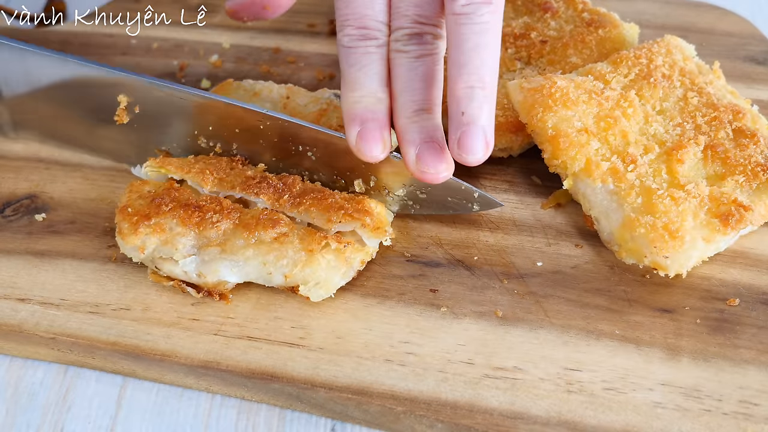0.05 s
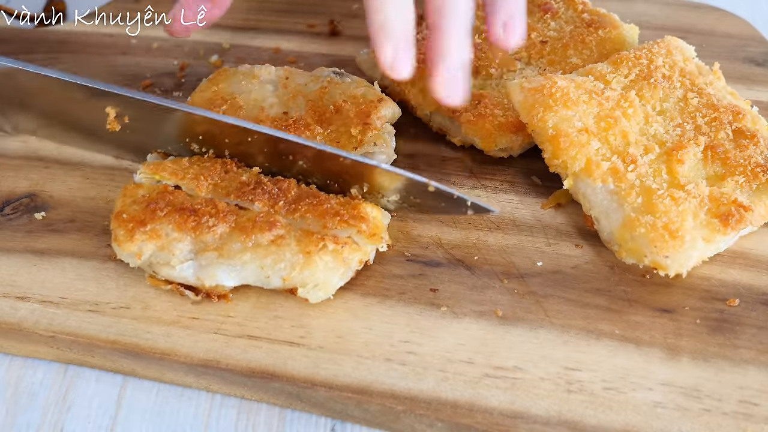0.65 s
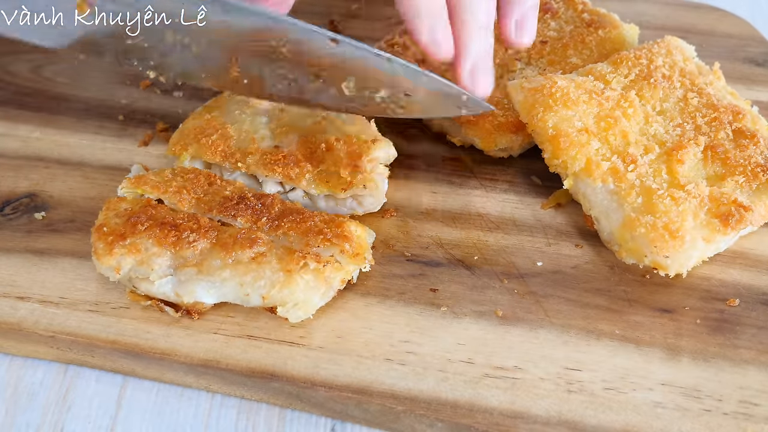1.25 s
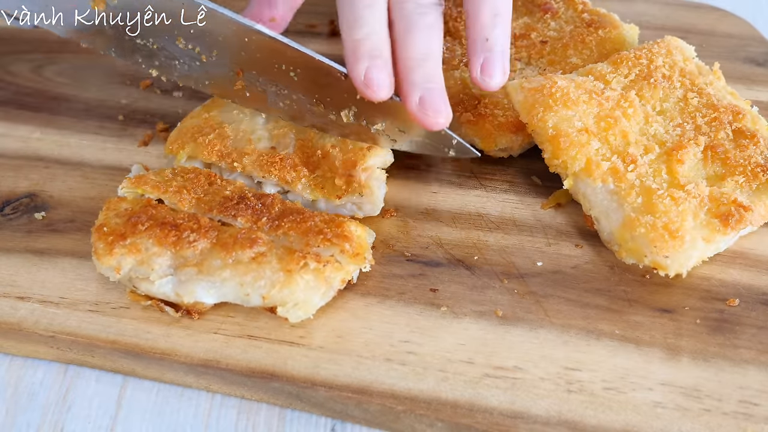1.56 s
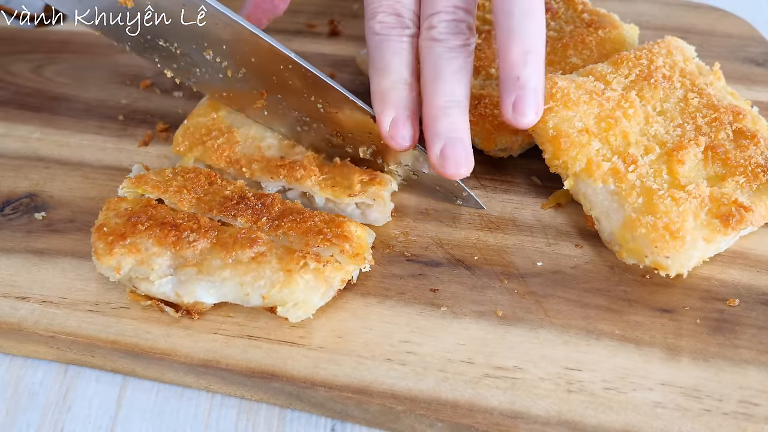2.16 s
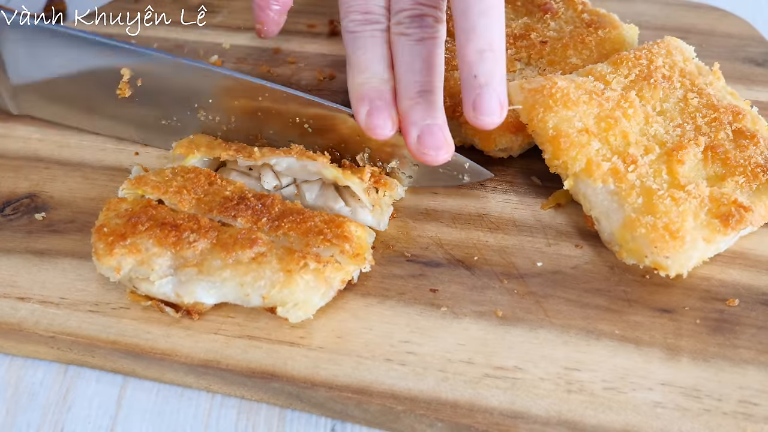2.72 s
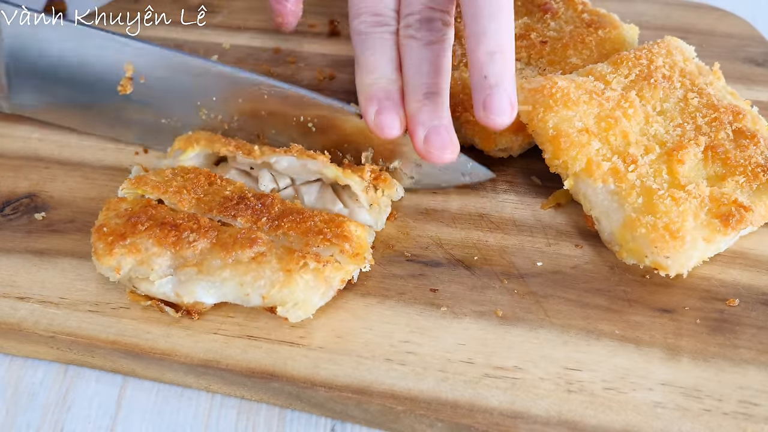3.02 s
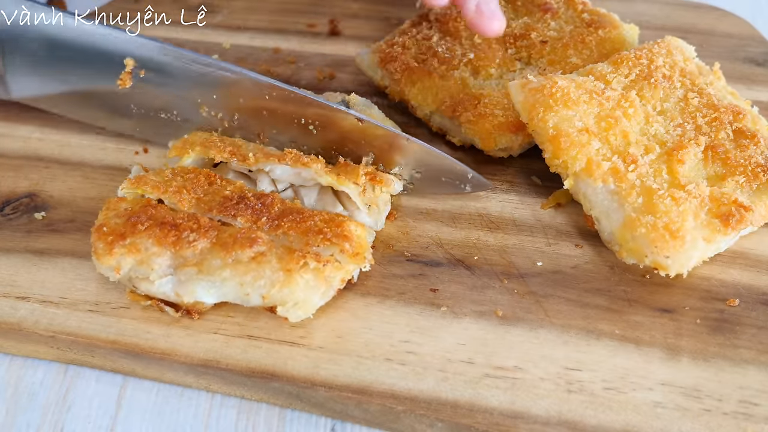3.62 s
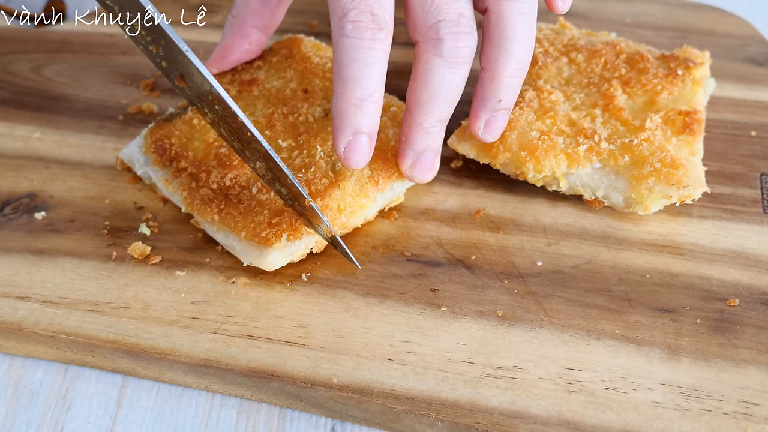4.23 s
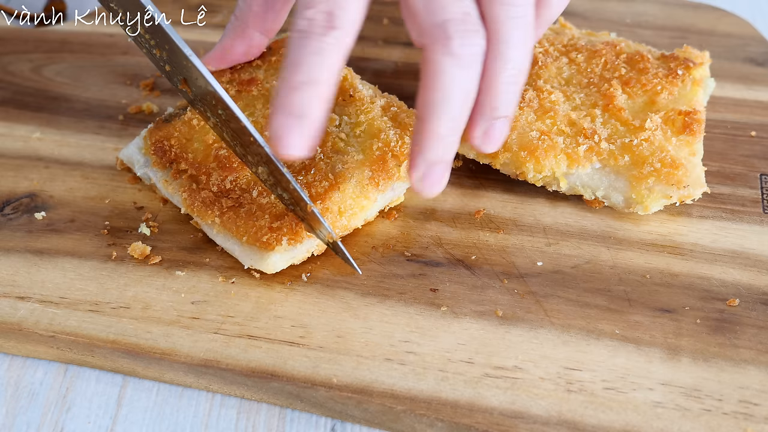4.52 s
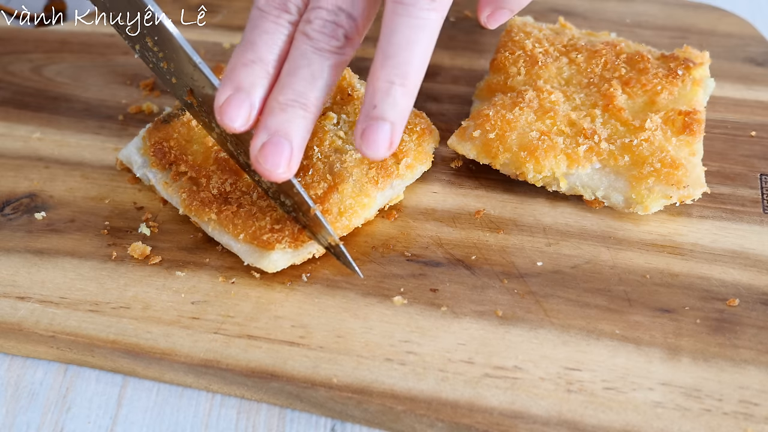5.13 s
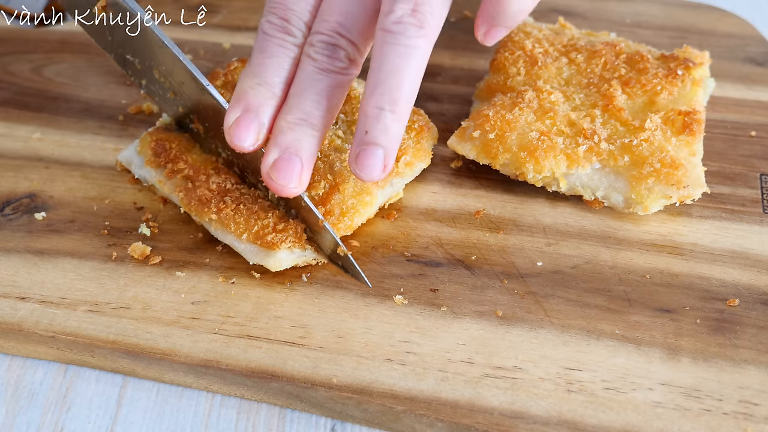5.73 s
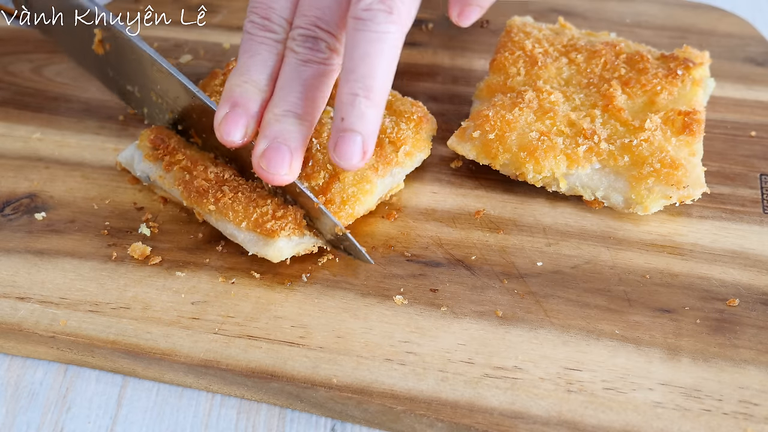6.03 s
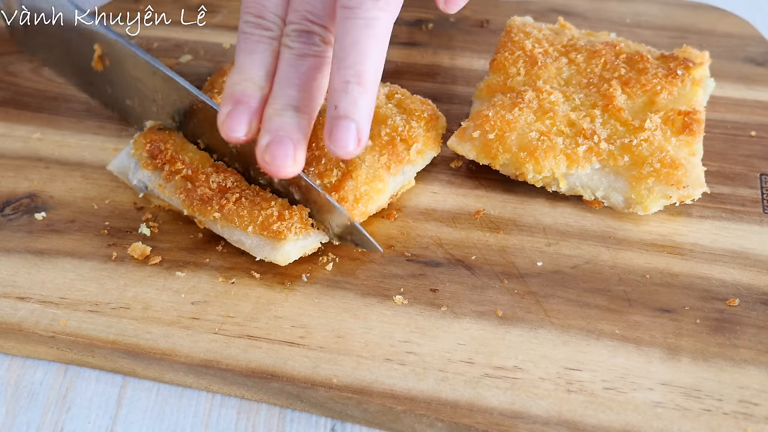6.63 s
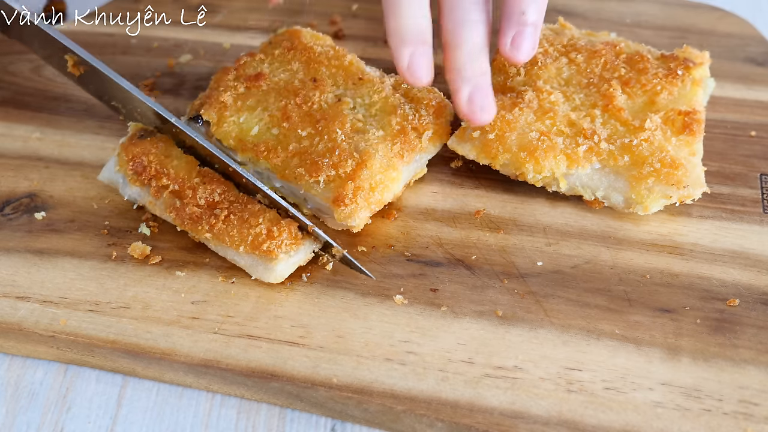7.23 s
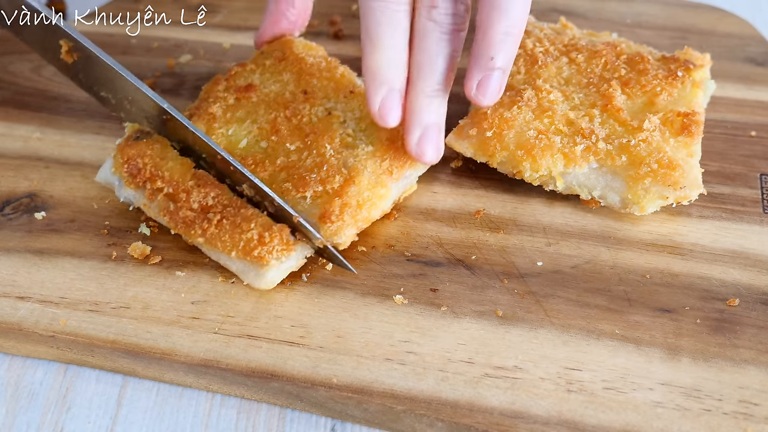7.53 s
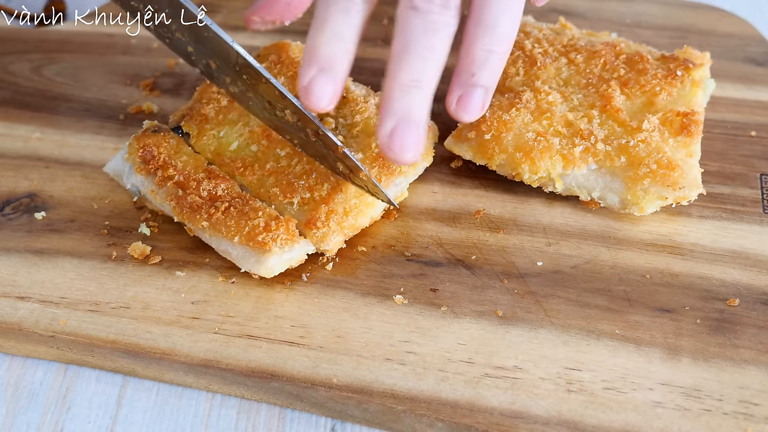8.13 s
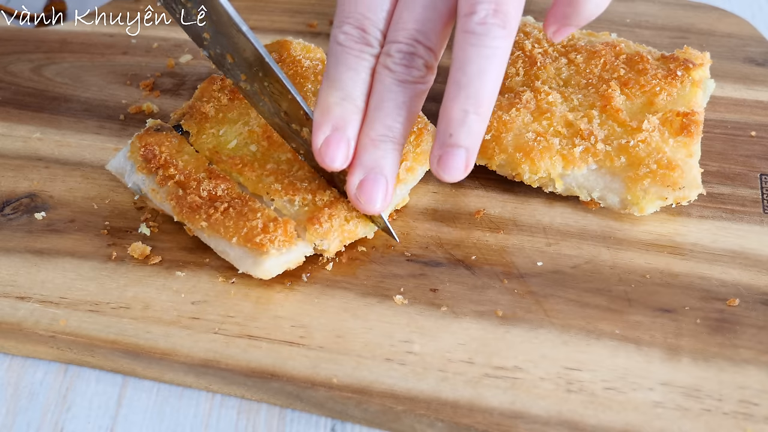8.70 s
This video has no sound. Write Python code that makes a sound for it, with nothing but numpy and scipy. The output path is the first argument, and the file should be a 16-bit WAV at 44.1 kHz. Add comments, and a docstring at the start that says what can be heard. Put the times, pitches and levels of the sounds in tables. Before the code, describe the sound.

Crisp fried crust crackles and crunches under a slicing knife, the blade rasping and knocking on a wooden cutting board.

```python
"""A chef's knife saws through crisp breaded cutlets on a wooden board, close by in a reverberant kitchen. First
a slice is finished: the crust crumbles and cracks by brittle fracture, the blade rasps, knocks on the wood,
ticks and, near 0.9 s, squeaks by stick-slip friction. From 1.7 s it cuts the first cutlet. After 4.1 s come a
soft tap and a sound that fades away; a second cutlet is cut from 5.3 s, its slice freed near 7 s, the next cut
begun at 8 s. Throughout, the board colours the fractures and a near wall echoes them."""
import sys
import numpy as np
from scipy import signal
from scipy.fft import rfft, irfft
from scipy.io import wavfile
from scipy.ndimage import uniform_filter1d

SR = 44100
rng = np.random.default_rng(int(sys.argv[2]) if len(sys.argv) > 2 else 0)


def log_audio(samples):
    """Write samples as a 16-bit WAV file to the path given in sys.argv[1]."""
    # one column per channel
    frames = np.atleast_2d(samples).T
    # limit to full scale, then quantise
    limited = np.clip(frames, -1, 1)
    pcm = np.round(limited * 32767).astype(np.int16)
    wavfile.write(sys.argv[1], SR, pcm)


N = 395136
TIME = np.arange(N) / SR
BINS = np.maximum(np.arange(N // 2 + 1) * SR / N, 1)
SECOND_CUTLET_S = 4.1

# Levels are relative, ahead of later gains. Body lifts the board's hollow note, crispness the treble.
# spectrum of the room's noise: f/Hz, level/dB
AIR_SPECTRUM = [(25, -22.5), (55, -12.5), (125, 4.5), (220, 6), (600, 3.5), (1200, -2), (3000, -16),
                (7000, -45), (11000, -35.5), (15000, -60.5)]
# pushes of knife or fingers: t/s, length/s, level/dB, swell over the push/dB, body/dB, crispness/dB
PUSHES = [ (0.0, 0.1, -29.5, 9, 2.5, -4), (0.188, 0.2, -35.5, 2.5, -3, -11),
          (0.425, 0.35, -53.5, 0, 10, 2.5), (0.855, 0.086, -49, 19, 0, 11),
          (0.889, 0.24, -39, -5.5, 3, -1.5), (1.147, 0.044, -48, -3.5, -5, 11),
          (1.518, 0.15, -55.5, -6, 6.5, 10.5), (1.745, 0.11, -45, 13, -2, 6), (1.838, 0.13, -38, 7, 2, 13),
          (1.984, 0.21, -39.5, -1, 0.5, 10), (2.248, 0.26, -35.5, 12.5, -3.5, 6.5),
          (2.493, 0.15, -36.5, 10, -5, 6), (2.656, 0.027, -25.5, 11, 2.5, 2),
          (2.779, 0.11, -40.5, 10, 2, 1), (2.895, 0.09, -34, -8, 3.5, 5.5), (3, 0.11, -40, 12, 0, -1),
          (3.122, 0.1, -33, -12, -17, -8), (3.441, 0.082, -59, 6, 0, 12),
          (4.154, 0.27, -51, -13.5, 14, 3.5), (4.487, 0.12, -45, -16, -1, 0.5),
          (4.61, 0.32, -48.5, 1, -1, 0), (4.814, 0.072, -35.5, -6.5, 2.5, 7),
          (5.06, 0.24, -48.5, 0.5, 1, 7), (5.301, 0.14, -41, 10, 4, 3.5), (5.478, 0.11, -38, -6.5, 5, 5),
          (5.586, 0.1, -28.5, -7, -9, 0.5), (5.669, 0.23, -37, -2, 1, 1.5),
          (5.955, 0.23, -32.5, -2, 4, -3.5), (6.172, 0.14, -37, 17, 6.5, -4), (6.4, 0.068, -23, 10, 1, -8),
          (6.477, 0.096, -32, -7, 1.5, -0.5), (6.637, 0.039, -29, 7, -4, -1),
          (6.744, 0.04, -30, -11, 6.5, 1), (6.848, 0.26, -45, -21, 3, -8.5),
          (7.09, 0.15, -41.5, 10.5, 7.5, -2), (7.244, 0.11, -49.5, -10, 2.5, 2),
          (7.4, 0.026, -41.5, 8, -14, -14), (7.477, .035, -35, 2.5, 1.5, -12),
          (7.543, 0.077, -31, 1, -2, -16), (7.652, 0.044, -33, -3.5, 4.5, -8.5),
          (7.996, 0.64, -59.5, -6, 0, 8.5), (8.324, 0.33, -51, 1, 1, 4.5), (8.625, 0.042, -43, 11, -5, 1.5),
          (8.689, 0.19, -42.5, 15, 2.5, 3)]
# bands that colour a fracture: f/Hz, share of body, share of crispness
COLOUR_BANDS = [(300, 0.44, 0.37), (660, 0.92, 0.087), (800, 0.87, 0.14), (1207, 0.68, 0.013),
                (1390, 0.59, 0.066), (3380, 0.21, 0.31), (6300, 0.19, 0.53), (10500, 0.1, 0.98)]
# spectrum of breaking crust: f/Hz, level/dB
CRUST_SPECTRUM = [(35, -50.5), (60, -30), (88, -14.5), (170, -17.5), (300, -14.5), (480, -11.5), (750, -6),
                  (1400, -1.5), (2200, -1), (4500, -2.5), (7700, -10), (10000, -9), (11500, -23.5),
                  (14500, -52.5)]
# modes of the board under the blade: f/Hz, width/Hz, lift at first cutlet/dB, lift at second/dB
BOARD_MODES = [(610, 96, -0.5, 3.5), (842, 126, 12.5, 7.5), (977, 36, 8, 6), (1050, 150, 7.5, 7),
               (1162, 36, 7, 6.5), (1400, 59, 2.5, 4.5), (1730, 340, 3.5, 3), (2494, 180, 3.5, 3),
               (2870, 190, 5, 2.5), (3617, 180, 6.5, 3.5), (4200, 310, 0.5, 2)]
# reverberation of the kitchen: f/Hz, level/dB, T60/s
REVERB_BANDS = [(100, 1, 0.61), (260, -0.5, 0.78), (420, -1, 0.41), (700, -9, 0.79), (1463, -6.5, 0.71),
                (4000, -8, 0.77), (9840, -9.5, 0.59)]
# the blade rubs on food and wood: t/s, level/dB, Gaussian width/s, f/Hz, bandwidth/Hz
RASPS = [(0.064, -31.5, 0.033, 1785, 281), (0.08, -36.5, 0.047, 1140, 220),
         (2.608, -29.5, 0.0054, 1000, 160), (2.678, -24.5, 0.0099, 980, 240), (2.746, -31, 0.013, 976, 180),
         (2.8, -36.5, 0.022, 950, 160), (2.878, -34, 0.02, 950, 140), (2.856, -37, 0.013, 1780, 200),
         (3.103, -29, 0.004, 1790, 240), (3.117, -34.5, 0.026, 1000, 201), (3.524, -51, 0.0056, 3480, 910),
         (6.333, -35, 0.04, 1060, 222), (6.462, -25.5, 0.013, 1700, 200), (6.525, -29.5, 0.0086, 1680, 180),
         (6.674, -36, 0.019, 1080, 130), (6.677, -35.5, 0.013, 1800, 200),
         (6.764, -29.5, 0.0068, 1705, 220)]
# large flakes break: t/s, level/dB, crispness/dB, time constant/s, flake f/Hz, ring level/dB
LARGE_CRACKS = [(0.0857, -50, 7, 0.0034, 5200, -33), (0.4504, -45, 11, 0.0053, 1730, -42.5),
                (1.093, -34, -11, 0.0057, 2670.0, -46), (1.527, -29.5, 6, 0.0042, 6330, -43.0),
                (1.595, -37, -21, 0.0012, 1930, -44), (1.792, -32, -15, 0.003, 10340.0, -49),
                (1.8195, -38.5, 28, 0.00036, 10240, -44), (1.877, -45.5, 29, 0.0009, 10100, -43),
                (1.9315, -27, -7, 0.0044, 4450, -32.5), (2.066, -36.5, 18, 0.0012, 9390.0, -43),
                (2.1387, -21, -27, 0.0024, 2420, -33.5), (2.239, -32, 6, 0.00065, 9100, -31),
                (2.251, -23, -6, 0.0017, 3650, -48), (2.2904, -25.5, -6, 0.003, 3530.0, -37),
                (2.3215, -34, 7, 0.002, 9500, -33), (2.3405, -52, 35, 0.00027, 9400, -47),
                (2.4205, -24.5, -9, 0.00067, 4540, -33), (2.462, -28, 1, 0.005, 4000, -36),
                (2.4887, -30, 15, 0.00049, 8960.0, -45), (2.5633, -22.5, -33, 0.0011, 2200, -31),
                (2.677, -25, -6, 0.0053, 3600, -29), (2.6845, -41, -14, 0.0024, 1600, -31),
                (2.6992, -22, 4, 0.00076, 3500, -26), (2.908, -24.5, -10, 0.0058, 1700, -26),
                (2.913, -22.5, -5, 0.0062, 1560, -31), (2.918, -35, 14, 0.002, 3730, -34),
                (2.931, -22, -4, 0.0031, 3840, -29), (2.971, -23, -6, 0.0017, 2880, -31),
                (3.105, -19, -10, 0.0047, 1850, -34), (3.683, -44, -8, 0.001, 3000, -46.5),
                (4.2985, -48, 4, 0.0012, 1310, -48), (4.496, -48, 4, 0.00073, 2150, -53),
                (4.5135, -30.5, -11, 0.0011, 2130, -40.5), (4.5759, -35.5, -13, 0.00084, 3300, -42.5),
                (4.6274, -37.5, 5, 0.0026, 4820.0, -49.0), (4.6463, -30.5, -21.0, 0.00088, 1980.0, -54),
                (4.8025, -33, 1, 0.0063, 4850, -41), (4.8553, -33, -8, 0.0043, 1450, -36),
                (5.0943, -29, -20, 0.0018, 1640.0, -37.5), (5.2261, -37, 0, 0.005, 4250, -44),
                (5.318, -28.5, 9, 0.0029, 1470, -33), (5.3921, -24, -24, 0.0027, 1780, -35),
                (5.499, -23.5, -1, 0.0061, 8100, -35), (5.508, -26, -12, 0.0012, 4700, -28),
                (5.569, -30, -7, 0.0018, 1660, -27.5), (5.588, -31.5, 7, 0.001, 6890.0, -32),
                (5.6378, -20, -20, 0.0031, 1730, -25), (5.6537, -17, -10, 0.0027, 1580, -30.5),
                (5.681, -26, -1, 0.00092, 3430, -32), (5.726, -28.5, 6.5, 0.0017, 3360.0, -35),
                (5.7605, -37, 11, 0.00061, 7500, -48.0), (5.7836, -27, 3, 0.0057, 1640, -26),
                (5.8172, -21, -11, 0.0033, 2900, -28), (5.9501, -22.5, -7.5, 0.0031, 1630, -29),
                (6.0139, -24, -5, 0.002, 5040, -31), (6.0297, -17, -8.5, 0.0025, 1380, -39),
                (6.1964, -22, -4, 0.0024, 1640.0, -31), (6.216, -19.5, -25, 0.004, 1660, -55),
                (6.4111, -12.5, -25.5, 0.0026, 1790, -22), (6.443, -27, -20, 0.006, 1700, -25),
                (6.52, -20.5, -24, 0.0052, 2580.0, -31), (6.561, -28, -17, 0.004, 2580.0, -43),
                (6.6124, -28.5, -8, 0.0027, 1630, -32), (6.948, -31.5, -13, 0.0024, 2400, -40),
                (7.2085, -33, -3, 0.005, 1700, -33.5), (7.2275, -36, 2, 0.0023, 1680, -42),
                (7.5097, -29.5, -21, 0.0047, 2800, -34.5), (7.9104, -36.5, -17, 0.00055, 2720, -50),
                (8.3277, -36.5, -5, 0.0041, 1720.0, -45.5), (8.3557, -39, 2, 0.0069, 4480.0, -44),
                (8.448, -38, -4, 0.0031, 2580, -45), (8.4525, -41, -6, 0.0034, 4730, -39),
                (8.527, -43, -5, 0.0016, 1020, -42.5), (8.5405, -37, 1, 0.0039, 4800, -41.5),
                (8.687, -37, -6, 0.0012, 5100, -34.5), (8.7365, -27.5, -4, 0.0034, 4950, -33.5),
                (8.7837, -31.5, 1.5, 0.0021, 6260, -38.5), (8.8445, -34.5, 4, 0.0072, 1450, -33.5),
                (8.895, -29.5, 6, 0.0054, 2170, -35)]
# the edge hits the board: t/s, level/dB, low f/Hz, high f/Hz, resonance (0-1), thud re contact/dB
IMPACTS = [(0.19, -16.5, 555, 3200, 0, -18.5), (0.1935, -19, 480, 2210, 0, -11),
           (2.677, -28.5, 420, 1100, 0.5, -16.5), (2.6995, -14, 554, 1460, 0.8, -25),
           (4.627, -39, 300, 893, 1, -33), (4.855, -39, 352, 745, 0.2, -13),
           (6.3059, -14.3, 730, 2340, 0.8, -20), (6.313, -20, 740, 1350, 0.9, -33),
           (6.412, -16.5, 700, 2300, 0.8, -32), (8.897, -26.5, 700, 1240, 0.7, -13.5)]
# light touches on the free blade: t/s, level/dB, crispness/dB, time constant/s
TOUCHES = [(0.532, -32, -3.5, .003), (0.6056, -36, -7, .007), (0.716, -34, -8, .008),
           (0.7238, -32, -11, .004), (4.1623, -36, -25, .007), (6.919, -30, -10.5, .004),
           (6.971, -32, -3, .004), (7.0542, -36.5, -2.5, .0025), (7.1787, -34, -1, .005),
           (7.286, -27, -16, .004), (7.9927, -33.5, -7, .005), (8.0667, -40.5, 0, 0.0049),
           (8.208, -43, 7.5, .004)]
# modes of the steel blade: f/Hz, level/dB
BLADE_MODES = [(1405, 0.5), (2700, 5), (3730, 3.5), (4400, 2.5), (5500, 1.5), (5820, 2), (6400, 1),
               (6800, -4), (7540, 2), (8030, 1), (8300, -9), (8800, 3.5), (10050, 0), (10350, -5.5),
               (11750, -12.5)]
# the blade sticks and slips on moist food: t/s, level/dB, Gaussian width/s
SQUEAK_SPURTS = [(0.91, -43, 0.0035), (0.93, -34.5, 0.0063), (0.946, -46, .006), (0.988, -38.5, 0.0086),
                 (1.023, -37, .006)]
# blade modes driven by the squeak: f/Hz, level/dB
SQUEAK_MODES = [(3620, -9), (5510, 1.5), (6440, -9), (9030, -12), (10120, -17)]


def undb(db):
    """Amplitude ratio: tenfold for every 20 dB."""
    return 10 ** (np.asarray(db) / 20)


def spectrum_db(hz, points):
    """Interpolation of (f/Hz, level/dB) points on a logarithmic frequency axis."""
    f, db = np.transpose(points)
    return np.interp(np.log(hz), np.log(f), db)


def unit(x):
    """Normalisation to unit energy."""
    return x / np.sqrt(np.sum(x ** 2))


def band(x, centres, index):
    """Complementary filtering: one of a set of overlapping bands that sum to the whole."""
    weights = np.interp(np.log(BINS), np.log(centres), np.arange(len(centres)) == index)
    return irfft(rfft(x) * weights, N)


def ring(x, response):
    """Convolution: a linear system answers every sample with its impulse response."""
    return signal.fftconvolve(x, response)[:N]


def impulse_size(db):
    """Equal energy: the impulse that has this level when spread over 10 ms."""
    return undb(db) * np.sqrt(SR / 100)


def room_air(mid_db=-59.5, side_db=6.0):
    """Diffuse field: faint steady noise that differs between the ears."""
    mid, side = irfft(rfft(rng.standard_normal((2, N))) * undb(spectrum_db(BINS, AIR_SPECTRUM)), N)
    side *= undb(side_db)
    return undb(mid_db) / mid.std() * np.array([mid + side, mid - side])


def effort(times, attack_s=0.021, release_s=0.017, stray_crumbs_db=-64.5):
    """Power addition: level of the overlapping pushes, with power-weighted body and crispness, in dB."""
    start, length, db, swell_db, body_db, crisp_db = np.transpose(PUSHES)
    t = np.asarray(times)[:, None] - start
    envelope = np.clip(t / attack_s, 0, 1) * np.exp(-np.maximum(t - length, 0) / release_s)
    power = (envelope * undb(db + swell_db * (np.clip(t / length, 0, 1) - .5))) ** 2
    total = power.sum(axis=1) + undb(stray_crumbs_db) ** 2
    return 10 * np.log10(total), power @ body_db / total, power @ crisp_db / total


def crumbling(gain_db=-0.12, per_s=2700, clump_s=.003, colour_db=2.0):
    """Brittle fracture as a Poisson process: tiny breaks, clumped in size, less even in dry crust."""
    breaks = rng.random(N) < per_s / SR
    times = TIME[breaks]
    level_db, body_db, crisp_db = effort(times)
    clumps, hollow, bright = (np.interp(times / clump_s, np.arange(N), row)
                              for row in rng.standard_normal((3, N)))
    uneven = np.clip(0.5 + 0.03 * crisp_db, .3, 2)
    size = np.zeros(N)
    size[breaks] = undb(uneven * (6 * rng.standard_normal(N)[breaks] + 4 * clumps))
    # the hand's effort sets the energy that the fractures share
    size /= np.sqrt(np.abs(uniform_filter1d(size ** 2, size=3600)) + 1e-9)
    return np.column_stack([times, size[breaks] * undb(level_db + gain_db),
                            body_db + colour_db * hollow, crisp_db + colour_db * bright])


def force(fractures, colour_db=2.5):
    """Superposition: each row (t/s, size, body/dB, crispness/dB) adds an impulse of its own colour."""
    s, size, body_db, crisp_db = fractures.T
    at = np.clip(s * SR, 0, N - 1).astype(int)
    size = size * rng.choice([-1, 1], len(s))
    centres = [row[0] for row in COLOUR_BANDS]
    out = np.zeros(N)
    for k, (_, body, crisp) in enumerate(COLOUR_BANDS):
        gain = undb(body * body_db + crisp * crisp_db + colour_db * rng.standard_normal(len(s)))
        out += band(np.bincount(at, size * gain, N), centres, k)
    return out


def board_response(spectrum, cutlet, resonance=1, size=2048):
    """Resonance: a minimum-phase click whose spectrum is lifted at the board's modes under one cutlet."""
    hz = np.maximum(np.arange(size // 2 + 1) * SR / size, 1)
    lift_db = sum(lifts[cutlet] / (1 + (2 * (hz - f) / width) ** 2) for f, width, *lifts in BOARD_MODES)
    cepstrum = irfft(np.log(undb(spectrum_db(hz, spectrum) + resonance * lift_db)))
    # folding the cepstrum makes the click causal
    cepstrum[1:size // 2] *= 2
    cepstrum[size // 2 + 1:] = 0
    return unit(irfft(np.exp(rfft(cepstrum))))


def kitchen(x, build_s=0.0023, early_s=0.0041):
    """Reverberation: early reflections off the worktop, then a diffuse tail strongest in the bass."""
    centres = [row[0] for row in REVERB_BANDS]
    swell = 1 - np.exp(-(TIME / build_s) ** 2)
    heard = []
    for tail_db, early_db in [(0, -14), (-8.5, -17)]:  # mid, side
        noise = rng.standard_normal(N)
        tail = sum(undb(db) * band(noise, centres, k) * unit(swell * np.exp(-np.log(1000) * TIME / t60))
                   for k, (_, db, t60) in enumerate(REVERB_BANDS))
        early = unit(rng.standard_normal(N) * TIME * np.exp(-TIME / early_s))
        heard.append(ring(x, (undb(tail_db) * tail + undb(early_db) * early)[:SR]))
    mid, side = heard
    return np.array([mid + side, mid - side])


def wall_echo(x, echo_db=-9.5, dull_hz=2600, delay_s=.00684):
    """Interference: one dull, delayed reflection comb-filters the direct sound it is added to."""
    delayed = rfft(x) * np.exp(-2j * np.pi * BINS * delay_s)
    return undb(echo_db) * irfft(delayed / (1 + (BINS / dull_hz) ** 4), N)


def rasping():
    """Forced vibration: each spurt of uneven friction drives one resonance of blade or board."""
    out = np.zeros(N)
    slips = rfft(rng.standard_normal(N))
    for s, db, width_s, hz, width_hz in RASPS:
        tone = irfft(slips / (1 + (2 * (BINS - hz) / width_hz) ** 4), N)
        spurt = np.exp(-.5 * ((TIME - s) / width_s) ** 2)
        out += undb(db) * unit(tone * spurt) * np.sqrt(np.sum(spurt ** 2))
    return out


def small_cracks(count=260, threshold_db=-50, spread_db=3.5, length_s=.0014, flake_hz=3600):
    """Fracture under load: small flakes snap oftener and louder under a hard push, faster when dry."""
    moments = np.linspace(0, TIME[-1], count * 20)
    load = np.cumsum(np.maximum(effort(moments)[0] - threshold_db, 0))
    times = np.interp(rng.random(count) * load[-1], load, moments)
    level_db, _, crisp_db = effort(times)
    louder, brighter, longer, higher = rng.standard_normal((count, 4)).T
    db = level_db - 4 + spread_db * np.minimum(louder, .5)
    lengths = length_s * undb(3 * longer - 0.4 * np.clip(crisp_db, 0, 16))
    hz = np.minimum(flake_hz * 2 ** (0.55 * higher), 10000)
    # same columns as LARGE_CRACKS
    return np.column_stack([times, db, crisp_db + spread_db * np.minimum(brighter, 1), lengths, hz, db - 5])


def avalanches(events, spread_db=4.5, bunching=1.3, count=48):
    """Avalanche: each event is a burst of impulses that thins out; the push couples it to the board."""
    rows = []
    _, bodies_db, _ = effort([row[0] for row in events])
    for (s, db, crisp_db, length_s, *_), body_db in zip(events, bodies_db):
        turn = (np.arange(count) + rng.random(count)) / count
        wait = (-np.log(1 - .95 * turn)) ** bunching
        size = unit(undb(spread_db * rng.standard_normal(count)) * np.exp(-.15 * wait))
        rows.append(np.column_stack([s + length_s * wait, size * impulse_size(db),
                                     np.full(count, body_db), np.full(count, crisp_db)]))
    return np.vstack(rows)


def flakes(cracks, t60_cycles=22, top_hz=11500, size=2048):
    """Damped free vibration: each flake that tears off rings briefly at its natural frequency."""
    out, t = np.zeros(N + size), TIME[:size]
    for s, _, _, length_s, hz, db in cracks:
        tearing = rng.standard_normal(size) * np.exp(-t / length_s)
        mode = np.sin(2 * np.pi * hz * t) * np.exp(-np.log(1000) * hz * t / t60_cycles)
        at = int(s * SR)
        out[at:at + size] += impulse_size(db) * unit(ring(tearing, mode)[:size])
    return signal.sosfilt(signal.butter(6, top_hz, fs=SR, output="sos"), out[:N])


def knocks(contact_s=0.0014, soft_hz=3600, thud_hz=(95, 330)):
    """Impact: a short rough contact, cushioned by food, excites the wood; the whole board thuds."""
    out, t = np.zeros(N), TIME[:SR // 4]
    heavy = signal.butter(2, thud_hz, "band", fs=SR, output="sos")
    thud = unit(signal.sosfilt(heavy, signal.unit_impulse(len(t))))
    soft = signal.butter(3, soft_hz, fs=SR, output="sos")
    for s, db, low_hz, high_hz, resonance, thud_db in IMPACTS:
        cushion = signal.butter(2, [low_hz, max(high_hz, 1.5 * low_hz)], "band", fs=SR, output="sos")
        roughness = rng.standard_normal(len(t)) * np.exp(-t / contact_s)
        contact = signal.sosfilt(np.vstack([cushion, soft]), roughness)
        board = board_response([(1, 0)], int(s > SECOND_CUTLET_S), resonance)  # flat but for the modes
        wood = ring(contact, board)[:len(t)]
        blow = impulse_size(db) * (unit(wood) + undb(thud_db) * thud)
        at = int(s * SR)
        out[at:at + len(t)] += blow[:N - at]
    return out


def blade_response(t60_s=.024, spot_db=2.5, detune=.012):
    """Normal modes of steel damped by the grip: the spot touched weights and slightly detunes them."""
    t = TIME[:SR // 4]
    modes = np.zeros(len(t))
    for hz, db in BLADE_MODES:
        gain = undb(db + spot_db * rng.standard_normal()) * rng.choice([-1, 1])
        modes += gain * np.sin(2 * np.pi * hz * (1 + detune * rng.standard_normal()) * t)
    return unit(modes * np.exp(-np.log(1000) * t / t60_s))


def crust_and_ticks(wood_db=-2.5, steel_db=-3, touch_wood_db=-3, flake_db=-1, spots=3):
    """Source and resonator: fractures and touches drive the board, touches the blade; flakes ring."""
    touches = force(avalanches(TOUCHES))
    cracks = np.vstack([LARGE_CRACKS, small_cracks()])
    drive = force(np.vstack([crumbling(), avalanches(cracks)])) + undb(touch_wood_db) * touches
    cutlet = TIME > SECOND_CUTLET_S
    wood = sum(ring(drive * (cutlet == k), board_response(CRUST_SPECTRUM, k)) for k in range(2))
    # successive touches land on different spots of the blade
    spot = np.searchsorted([row[0] for row in TOUCHES], TIME) % spots
    steel = sum(ring(touches * (spot == k), blade_response()) for k in range(spots))
    return undb(wood_db) * wood + undb(steel_db) * steel + undb(flake_db) * flakes(cracks)


def squeaking(waver_hz=35, stutter_db=4.0, slip_s=.0025):
    """Stick-slip friction sustains the blade's modes at a nearly steady pitch in stuttering spurts."""
    spurts = sum(undb(db) * np.exp(-.5 * ((TIME - s) / width_s) ** 2) for s, db, width_s in SQUEAK_SPURTS)
    out = np.zeros(N)
    for hz, db in SQUEAK_MODES:
        waver, grip = (np.interp(TIME / slip_s, np.arange(N), row) for row in rng.standard_normal((2, N)))
        out += undb(db + stutter_db * grip) * np.sin(2 * np.pi * np.cumsum(hz + waver_hz * waver) / SR)
    return spurts * out


def scene():
    """Direct plus reflected sound: central sources, stripped of deep bass, and the kitchen."""
    deep_cut = signal.butter(4, 62, "high", fs=SR, output="sos")
    direct = signal.sosfilt(deep_cut, crust_and_ticks() + knocks() + rasping() + squeaking())
    return direct + wall_echo(direct) + kitchen(direct) + room_air()


def record(dry):
    """Band limiting and clipping: a bass cut, a narrow treble notch, peaks held, then a top cut."""
    bass_cut = signal.butter(2, 45, "high", fs=SR)
    notch = signal.iirnotch(7820, Q=30, fs=SR)
    top_cut = signal.ellip(8, .2, 70, 15500, fs=SR, output="sos")
    filtered = signal.lfilter(*notch, signal.lfilter(*bass_cut, dry))
    return signal.sosfilt(top_cut, np.clip(filtered, -1, 1))


dry = scene()
out = record(dry)
log_audio(out)
```